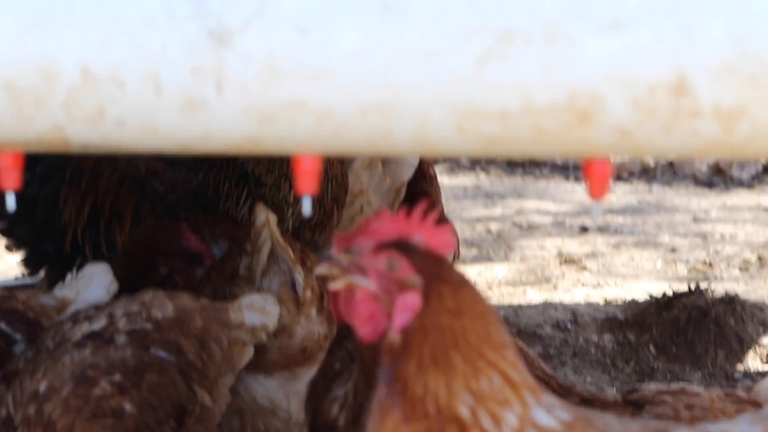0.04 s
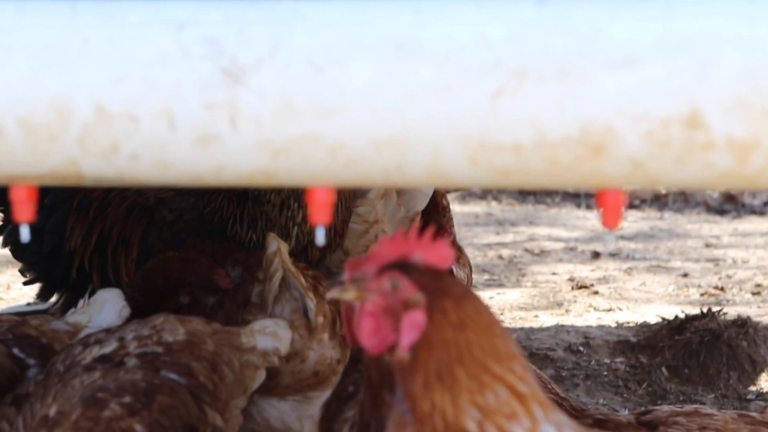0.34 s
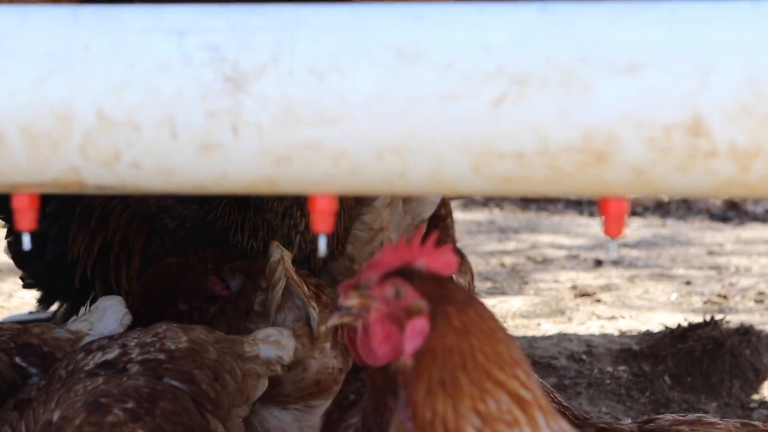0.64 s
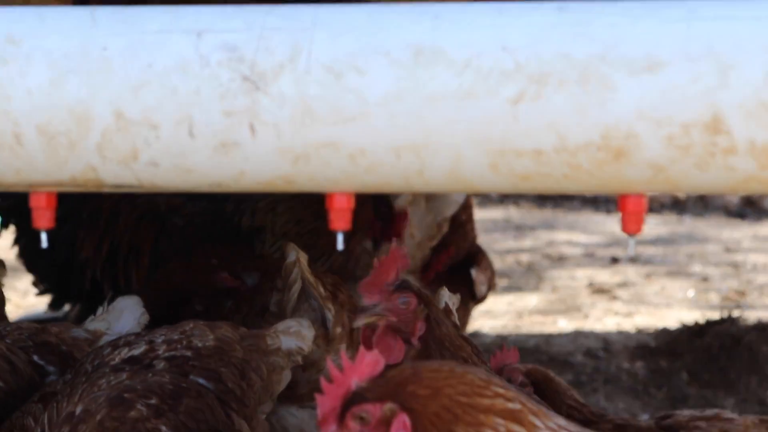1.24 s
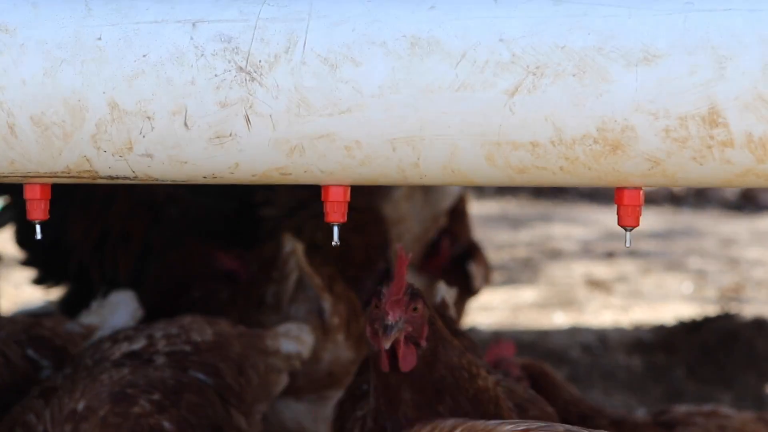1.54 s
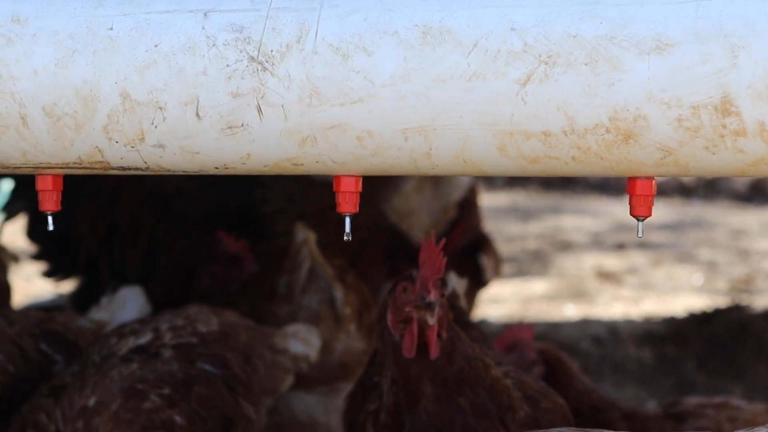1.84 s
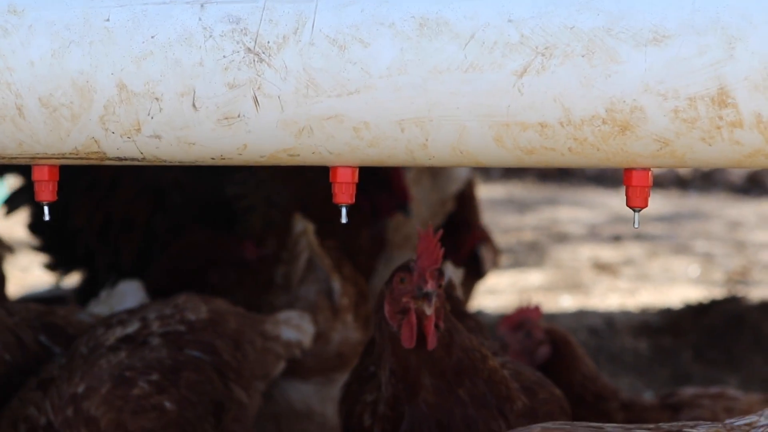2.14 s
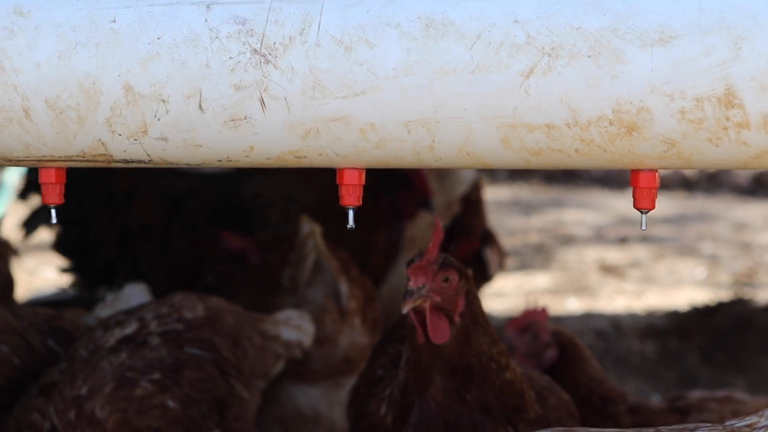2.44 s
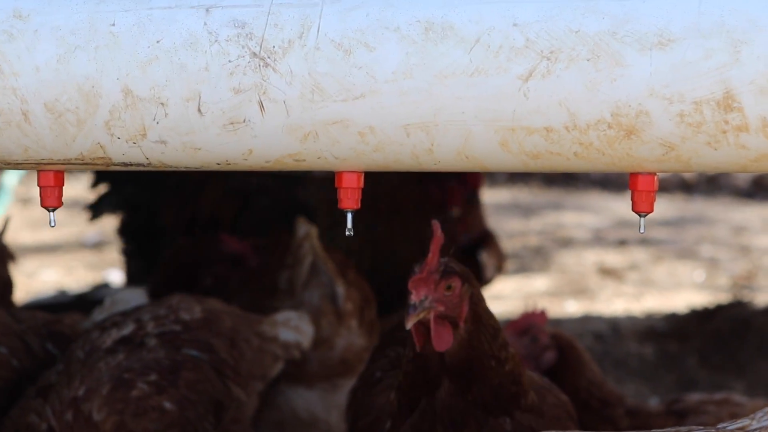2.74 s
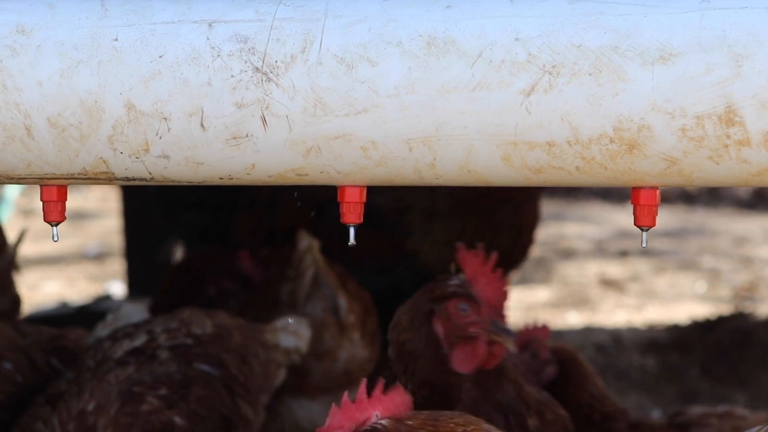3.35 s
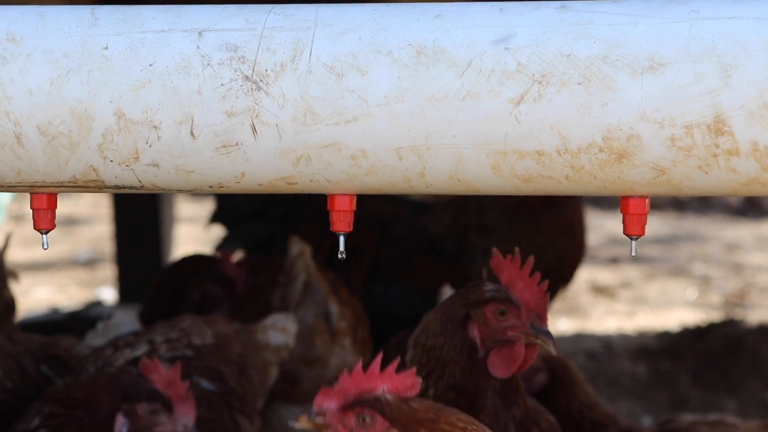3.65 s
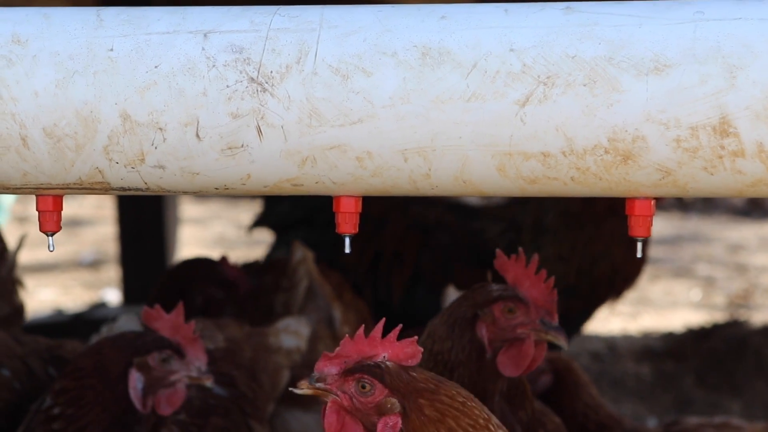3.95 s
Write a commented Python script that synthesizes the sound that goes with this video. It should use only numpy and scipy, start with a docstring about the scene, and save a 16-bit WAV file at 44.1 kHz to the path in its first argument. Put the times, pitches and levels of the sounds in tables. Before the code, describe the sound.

Hens peck at nipple drinkers, the steel pins clicking and rattling irregularly on a hollow pipe from about 1.2 to 3.8 seconds. Before that come a soft cluck and scratchy snick at 0.2 seconds, then faint distant peeps. A lens motor ticks and briefly whirrs between 0.6 and 1.6. Beaks knock on plastic around 3.4. Wind rumbles and thumps on the microphone throughout, strongest near 3.8.

```python
"""Wind rumbles and buffets the microphone in a yard while hens cluck, snick and scuff the dry ground.
A bird peeps faintly further off, and a lens motor ticks and whirrs beside the microphone.
Up front the hens drink from nipple drinkers on a plastic pipe: the steel pins click and rattle,
the pipe answers with a hollow ring, and beaks knock on the plastic."""
import sys
import numpy as np
from scipy import signal
from scipy.fft import rfft, irfft
from scipy.io import wavfile

SR = 44100
rng = np.random.default_rng(int(sys.argv[2]) if len(sys.argv) > 2 else 0)


def materialize(psi):
    """Save the field psi as 16-bit PCM at rate SR to the path in sys.argv[1].

    A 1-D psi becomes a single channel; in a 2-D psi each row is a channel.
    """
    bounded = np.clip(np.atleast_2d(psi).T, -1, 1)
    quanta = np.round(bounded * 32767).astype(np.int16)
    wavfile.write(sys.argv[1], SR, quanta)


N = 176400
TIME = np.arange(N) / SR

# Tone of the yard's ambience. Each row: frequency in Hz, relative level in dB.
YARD_COLOUR = [(250,-14),(600,-18.5),(2200,-24.5),(4600,-32.5),(12000,-34),(16000,-46)]
# Distant peeps. Each row: start in seconds, length in seconds, level in dB.
FAR_PEEPS = [(.53,0.055,-64.5),(0.687,0.085,-55),(.8,0.068,-58.5),(0.971,.085,-56),(1.095,0.046,-60)]
# Swells of the wind's rumble. Each row: time in seconds, level in dB.
WIND_SWELLS = [(0,-38),(.18,-31.5),(.48,-42),(.74,-30.5),(.98,-41.5),(1.22,-35),(1.39,-25),(1.5,-40),(1.8,-38),(2.07,-30),(2.16,-41),(2.52,-50),(2.79,-38.5),(2.87,-33),(3.17,-37),(3.36,-26),(3.52,-36.5),(3.66,-38),(3.75,-19),(3.86,-31),(4,-37)]
# Tone of the rumble. Each row: frequency in Hz, relative level in dB.
RUMBLE_COLOUR = [(20,-65),(40,-7.5),(65,2),(130,2),(200,-3),(450,-24.5),(2000,-61.5)]
# Eddies hitting the microphone. Each row: centre in seconds, peak level in dB, pitch in Hz.
EDDIES = [(0.107,-21.5,128),(0.423,-19.5,107),(.537,-17.5,140),(.55,-21,174),(.714,-16,177),(0.772,-25.5,161),(0.864,-23.5,159),
          (1.171,-15.5,169),(1.208,-12,162),(1.345,-21,205),(1.365,-20.5,160),(1.5834,-11.5,680),(1.586,-12.5,189),(1.59,-15,200),(1.74,-17.5,157),(1.797,-15.5,230),(1.869,-9.5,216),(1.961,-19,146),(1.969,-14.5,654),(1.971,-10,216),(2.039,-19.5,123),(2.048,-17,149),(2.216,-23.5,203),
          (2.373,-26.5,139),(2.761,-25,147),(2.851,-14,147),(2.923,-29,240),(3.007,-26,137),(3.322,-21.5,360),(3.3455,-17,250),(3.357,-20.5,245),(3.374,-13.5,189),(3.461,-16,131),(3.476,-16,194),(3.618,-18.5,136),(3.681,-18,240),(3.703,-13.5,190),(3.735,-11,160),(3.7484,-18,430),(3.752,-7,204),(3.7536,-19.5,586),(3.765,-8.5,190),(3.7777,-17,545),(3.7794,-6,205),(3.8,-26,330),(3.833,-24,343),(3.87,-26,328),(3.916,-9.5,213)]
# Moves of the lens motor. Each row: start in seconds, stop in seconds, starting knock's pitch in Hz.
LENS_MOVES = [(.6045,0.6444,1470),(0.6726,0.7336,1740),(0.942,0.9827,1420),(1.006,1.0305,1730),(1.074,1.0924,1680),(1.2983,1.304,2300),(1.3654,1.372,2740),(1.432,1.438,2760),(1.496,1.5048,1940),(1.545,1.545,2540),(1.5746,1.59,2700)]
# Lens barrel resonances. Each row: frequency in Hz, relative level in dB, 60 dB decay in seconds.
BARREL_MODES = [(660,1,0.02),(1040,-5,0.0081),(1720,-9,0.01),(2010,-12,0.011),(2610,-9.5,0.012),(3030,-6,0.014)]
# Fader curve of the gear whirr. Each row: time in seconds, level in dB.
WHIRR_LEVELS = [(.9,-63),(1.13,-66),(1.2,-51),(1.6,-53.5),(1.63,-75)]
# A hen's snick and scuffs of feet and feathers. Each row: start in seconds, rise in seconds,
# 60 dB decay in seconds, level in dB, resonance in Hz, hiss against the body in dB.
RASPS = [(0.191,0.013,0.03,-36.5,3070,-8),(0.198,0.004,0.039,-39.5,1130,-22),(.21,0.0091,0.22,-49.5,2780,-6),(.25,0.017,0.11,-55.5,1960,0),(2.344,0.0068,0.059,-47,710,-30),(3.101,0.0094,0.052,-43.5,930,-22),(3.17,0.057,0.03,-67.5,2680,8.5),(3.351,0.031,0.049,-41,1640,-9),(3.59,0.011,0.16,-57,2320,-8.5)]
# Beaks on plastic. Each row: start in seconds, level in dB, main resonance in Hz.
BEAK_KNOCKS = [(.2103,-26.5,2620),(1.6715,-33.5,1700),(1.6995,-31,2700),(3.3735,-24.5,2520),(3.3741,-24,1600),(3.379,-24.5,2470),(3.3862,-19,1580),(3.3983,-26.5,1680),(3.4064,-33,1750),(3.4426,-36,1790)]
# The struck spot. Each row: ratio to the main resonance, relative level in dB, 60 dB decay in seconds.
SPOT_MODES = [(.7,-14,0.0052),(1,3,0.012),(1.17,0,0.0035),(1.55,-4.5,0.004)]
# The whole plastic shell. Each row: frequency in Hz, relative level in dB, 60 dB decay in seconds.
SHELL_MODES = [(1625,-20,.09),(2365,-22,.07),(2585,-28.5,.08)]
# Drinker pin hits. Each row: start in seconds, relative level in dB, rattle send in dB.
PIN_HITS = [(1.1609,-31.5,-14),(1.167,-35,-9.5),(1.2327,-34,-12),(1.248,-43,-12),(1.442,-33.5,-17),(1.4476,-33,-10),
            (1.6422,-32.5,-17),(1.6468,-27.5,-18),(1.6962,-43.5,4),(1.717,-43,-17),(1.838,-32.5,-14),(1.8535,-39,-7),(1.864,-35,-18),(1.893,-36.5,-9),
            (2.0465,-40,-16.5),(2.0694,-37.5,-15),(2.095,-35.5,-9),(2.3217,-28,-16.5),(2.3255,-25,-24),(2.3392,-28.5,-16),
            (2.4702,-28.5,-12),(2.5103,-47,-4),(2.5808,-43.5,-33),(2.7573,-47,-7),(2.801,-56,0.5),(3.443,-48.5,-7),(3.7077,-34.5,-9.5),(3.7137,-28,-22),(3.7613,-42,-24),(3.832,-52,-3.5)]
# Ring of pin and housing. Each row: frequency in Hz, relative level in dB, 60 dB decay in seconds.
PIN_RING = [(5930,-0.5,0.01),(6620,3,0.0069),(7850,8,0.0036),(8730,-2,0.029),(10280,-3,0.0087),(10640,-5,0.017),(12070,6,0.0065),(13800,3.5,0.0028)]
# Tone of the pins' chatter and the lens's dry click. Each row: frequency in Hz, relative level in dB.
RATTLE_COLOUR = [(1200,-5.5),(1900,3),(4800,-3.5),(8800,-1.5),(12000,-8.5),(16000,-16)]
# Hollow tone of the pipe. Each row: frequency in Hz, relative level in dB.
PIPE_COLOUR = [(350,-43),(600,-4.5),(900,7),(1300,0.5),(2200,-3.5),(6000,-25)]


def from_db(db):
    """Decibels to gain."""
    return 10 ** (np.asarray(db) / 20)


def rms_one(x):
    """Scale to unit rms."""
    return x / np.sqrt(np.mean(x ** 2) + 1e-20)


def noise(colour):
    """Unit noise with the given (Hz, dB) colour."""
    hz, db = np.transpose(colour)
    bins_hz = np.maximum(np.fft.rfftfreq(N, 1 / SR), 1)
    eq = from_db(np.interp(np.log(bins_hz), np.log(hz), db))
    return rms_one(irfft(rfft(rng.standard_normal(N)) * eq, N))


def butter(x, hz, kind, order=2):
    """Butterworth filter."""
    return signal.sosfilt(signal.butter(order, np.clip(hz, 10, SR / 2 - 10), kind, fs=SR, output="sos"), x)


def drift(rate_hz):
    """A random wobble of unit rms."""
    return rms_one(butter(rng.standard_normal(N), rate_hz, "low"))


def ring(x, hz, t60):
    """A resonator: a unit click sets a sine of height 1 ringing."""
    r, w = from_db(-60 / (t60 * SR)), 2 * np.pi * hz / SR
    return signal.lfilter([0, np.sin(w)], [1, -2 * r * np.cos(w), r * r], x + 1e-18)


def clicks(times, gain):
    """Impulses at the given times in seconds."""
    samples = np.clip(np.atleast_1d(times) * SR, 0, N - 1).astype(int)
    return np.bincount(samples, np.atleast_1d(gain), N)


def fade(x, t60):
    """Give each impulse an exponential tail."""
    return signal.lfilter([1], [1, -from_db(-60 / (t60 * SR))], x + 1e-18)


def strike(times, db, modes, vary_db):
    """Each blow excites each mode with its own strength and sign."""
    out = np.zeros(N)
    for hz, mode_db, t60 in modes:
        gains = from_db(db + mode_db + rng.normal(0, vary_db, len(times)))
        signs = rng.choice([-1, 1], len(times))
        out += ring(clicks(times, gains * signs), hz, t60)
    return out


def yard():
    """A quiet, steady bed of open air."""
    return from_db(-57.5) * noise(YARD_COLOUR)


def far_bird(top_hz=2590, arch_hz=140.4, waver_hz=46):
    """Thin, wavering whistles that arch in pitch and level."""
    out, waver = np.zeros(N), waver_hz * drift(140)
    for start, length, db in FAR_PEEPS:
        arch = np.clip(2 * (TIME - start) / length - 1, -1, 1) ** 2  # 1 at the ends, 0 in the middle
        pitch = top_hz - arch_hz * arch + waver
        out += from_db(db) * np.sqrt(1 - arch) * np.sin(2 * np.pi * np.cumsum(pitch) / SR)
    return out


def wind_rumble(lump_db=4.3):
    """Wind on the microphone: a lumpy low end that swells and sinks."""
    swells = from_db(np.interp(TIME, *np.transpose(WIND_SWELLS)))
    return swells * rms_one(noise(RUMBLE_COLOUR) * from_db(lump_db * drift(28)))


def wind_buffets():
    """Single eddies each swing the diaphragm for a cycle or two."""
    out, usual_hz = np.zeros(N), np.median(np.array(EDDIES)[:, 2])
    for centre, db, hz in EDDIES:
        roundness = 2.95 * (1 + 0.41 * (usual_hz / hz) ** 4)  # slow eddies are rounder and swing longer
        near = np.abs(TIME - centre) < 6 / hz
        cycle = 2 * np.pi * hz * (TIME[near] - centre) / (roundness - .5)
        phasor = np.exp(2j * np.pi * rng.random())
        out[near] += from_db(db) * np.real(phasor / (1 - 1j * cycle) ** roundness)
    return butter(out, 1330, "low", order=8)


def lens_motor(knock_t60=.007):
    """Every move starts with a hollow knock and stops with a tick; running gears rub the same barrel."""
    starts, stops, _ = np.transpose(LENS_MOVES)
    ticks = strike(starts, -38, BARREL_MODES, vary_db=2.5) + strike(stops, -35, BARREL_MODES, vary_db=1)
    knocks = sum(ring(clicks(start, from_db(-37)), hz, knock_t60) for start, _, hz in LENS_MOVES)
    contacts = clicks(np.r_[starts, stops], np.ones(2 * len(LENS_MOVES)))
    # The barrel lets out only a faint dry click of treble.
    leak = from_db(-45.5) * fade(contacts, knock_t60) * noise(RATTLE_COLOUR)
    gears = sum(from_db(db) * ring(rng.standard_normal(N), hz, t60) for hz, db, t60 in BARREL_MODES)
    fader = from_db(np.interp(TIME, *np.transpose(WHIRR_LEVELS), left=-np.inf, right=-np.inf))
    whirr = fader * rms_one(butter(gears, 3980, "low"))
    return butter(ticks + knocks, 3500, "low", order=6) + leak + whirr


def snick_and_scuffs(hiss_hz=7150, width=0.78, grain_db=3):
    """Gritty friction that swells and dies, with a broad resonance and a hiss above it."""
    out, grit = np.zeros(N), from_db(grain_db * drift(700))
    hiss = butter(rng.standard_normal(N), [hiss_hz * 0.9, hiss_hz * 1.45], "band", order=1)
    hiss = rms_one(butter(hiss, 3700, "high"))
    for start, rise, t60, db, hz, hiss_db in RASPS:
        body = butter(rng.standard_normal(N), [hz / (1 + width), hz * (1 + width / 2)], "band", order=1)
        body = rms_one(butter(body, hz * 1.13, "low", order=4))
        attack = np.clip((TIME - start) / rise, 0, 1) ** 0.51
        release = from_db(-60 * (np.maximum(TIME - start - rise, 0) / t60) ** 2.95)
        out += from_db(db) * attack * release * (body + from_db(hiss_db) * hiss)
    return out * rms_one(grit)


def snick_whistle(centre_s=0.342, width_s=0.024, hz=4980):
    """A thin, breathy whistle in the tail of the snick."""
    envelope = np.exp(-((TIME - centre_s) / width_s) ** 2)
    return from_db(-63) * envelope * rms_one(ring(rng.standard_normal(N), hz, width_s))


def cluck(centre_s=0.182, width_s=0.0069, hz=488):
    """One soft closed-beak cluck, a few cycles long."""
    t = TIME - centre_s
    return from_db(-31.5) * np.exp(-(t / width_s) ** 2) * np.sin(2 * np.pi * hz * t)


def beak_knocks():
    """Short hollow knocks whose pitch depends on the spot struck; the whole shell rings on faintly."""
    spots = np.zeros(N)
    for start, db, hz in BEAK_KNOCKS:
        for k, (ratio, mode_db, t60) in enumerate(SPOT_MODES):
            spots += (-1) ** k * ring(clicks(start, from_db(db + mode_db)), hz * ratio, t60)
    starts, levels_db, _ = np.transpose(BEAK_KNOCKS)
    shell = strike(starts, levels_db, SHELL_MODES, vary_db=0.5)
    return butter(spots + shell, 3300, "low", order=6)  # the contact is too soft to ring any higher


def drinker_pins(rattle_t60=0.069, pipe_t60=0.11, pipe_swell_s=0.0035):
    """A pin snaps against its seat, chatters briefly, and the pipe answers lower and later."""
    starts, db, send_db = np.transpose(PIN_HITS)
    snap = strike(starts, db - 10.5, PIN_RING, vary_db=2.5)
    energy = clicks(starts, from_db(db + send_db) ** 2)  # overlapping rattles add in energy
    rattle = np.sqrt(fade(energy, rattle_t60 / 2)) * noise(RATTLE_COLOUR)
    pipe_energy = butter(fade(energy, pipe_t60 / 2), 1 / (2 * np.pi * pipe_swell_s), "low", order=1)
    pipe = np.sqrt(np.abs(pipe_energy)) * noise(PIPE_COLOUR)
    return snap + from_db(1) * rattle + from_db(-2.5) * pipe


def scene():
    """A mono mix: birds and drinkers in the open air, wind and lens right at the microphone."""
    hens = drinker_pins() + beak_knocks() + snick_and_scuffs() + snick_whistle() + cluck()
    return (hens + far_bird() + lens_motor() + wind_rumble() + wind_buffets() + yard())[None]


def record(dry, low_cut_hz=38, high_cut_hz=16200):
    """The microphone rolls off the deepest wind, and the top is cut steeply."""
    trimmed = butter(dry, low_cut_hz, "high")
    return signal.sosfilt(signal.ellip(10, .1, 80, high_cut_hz, fs=SR, output="sos"), trimmed)


dry = scene()
out = record(dry)
materialize(out)
```